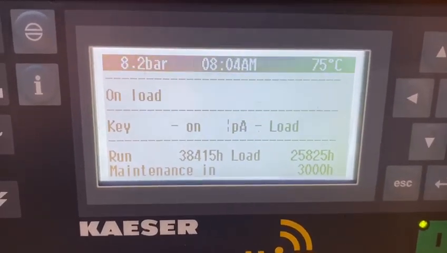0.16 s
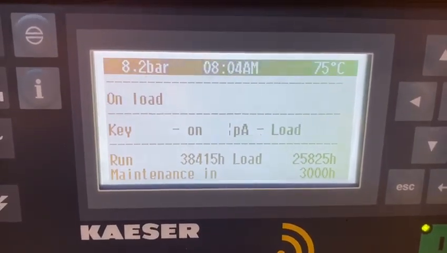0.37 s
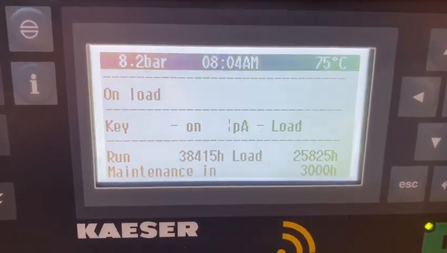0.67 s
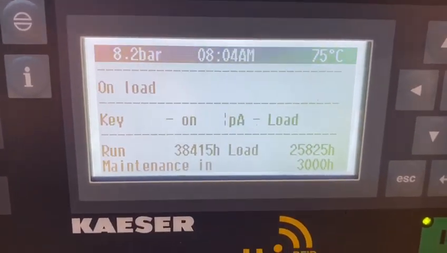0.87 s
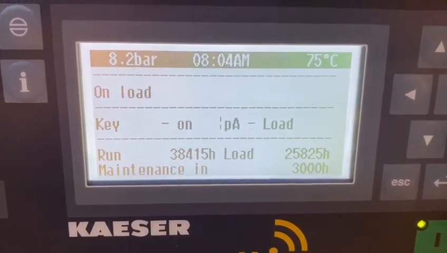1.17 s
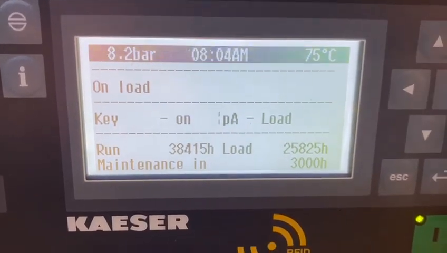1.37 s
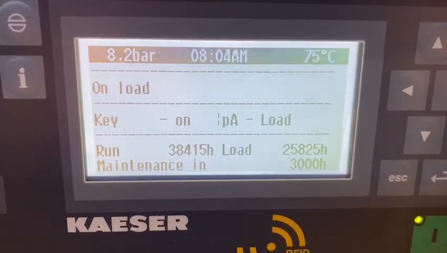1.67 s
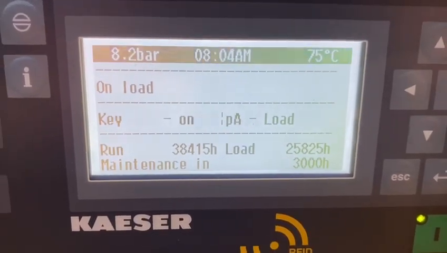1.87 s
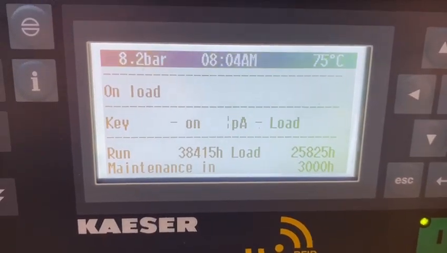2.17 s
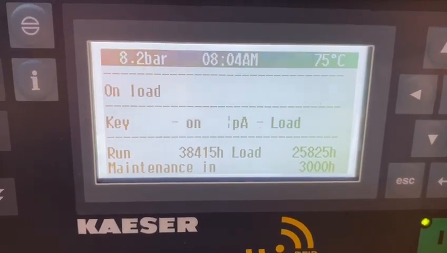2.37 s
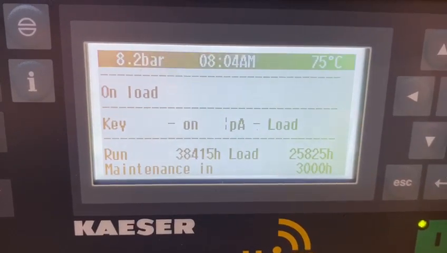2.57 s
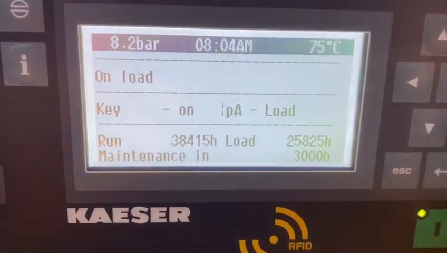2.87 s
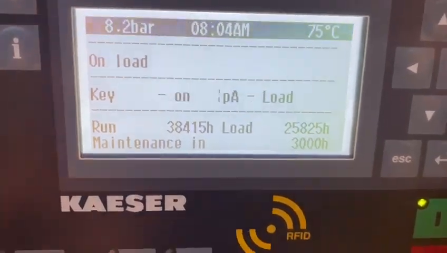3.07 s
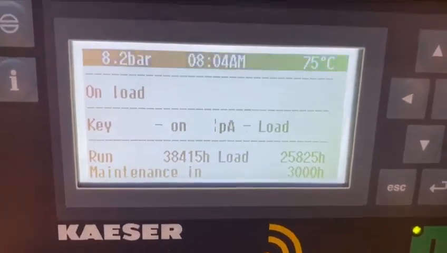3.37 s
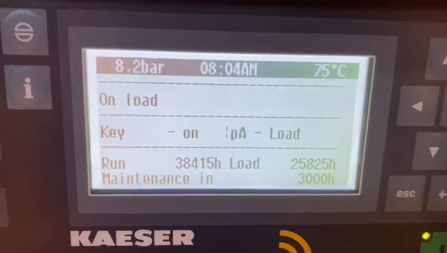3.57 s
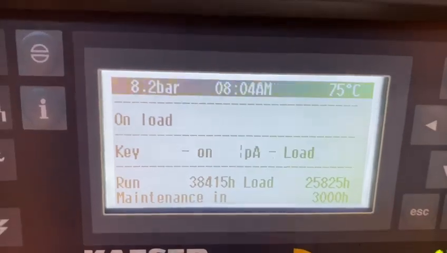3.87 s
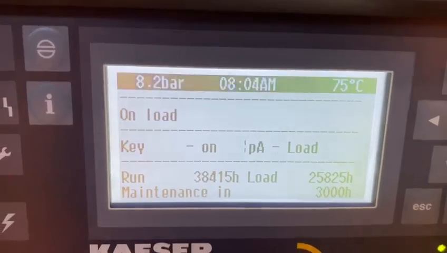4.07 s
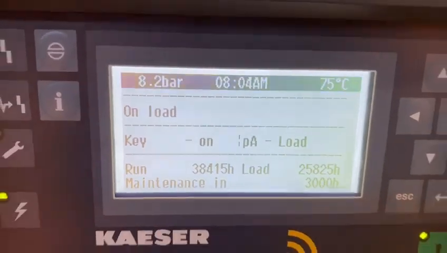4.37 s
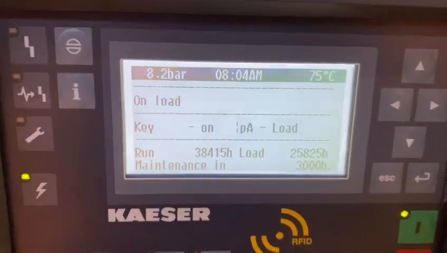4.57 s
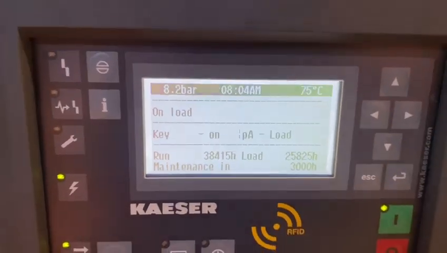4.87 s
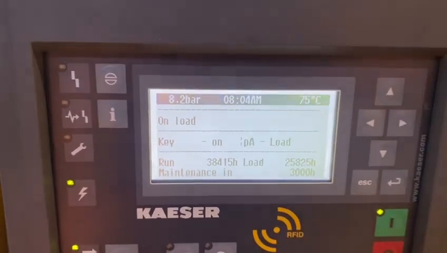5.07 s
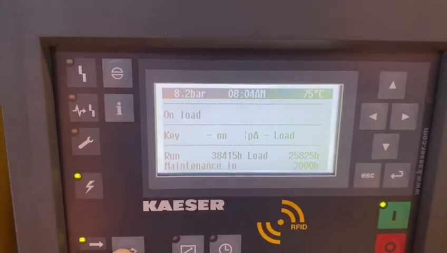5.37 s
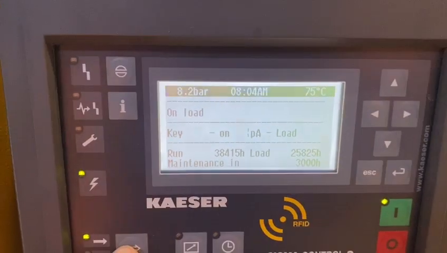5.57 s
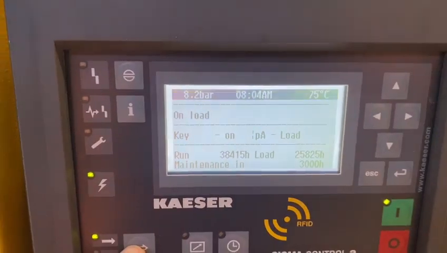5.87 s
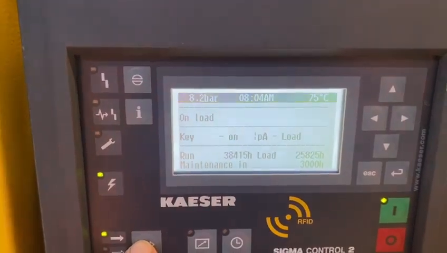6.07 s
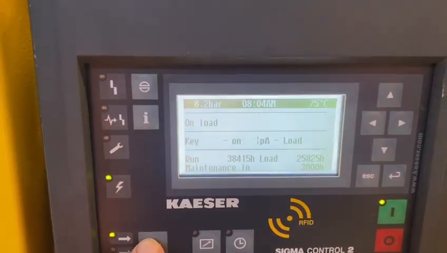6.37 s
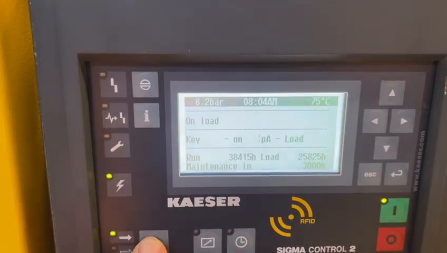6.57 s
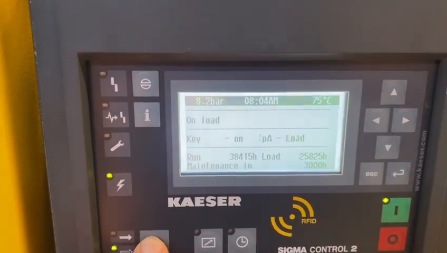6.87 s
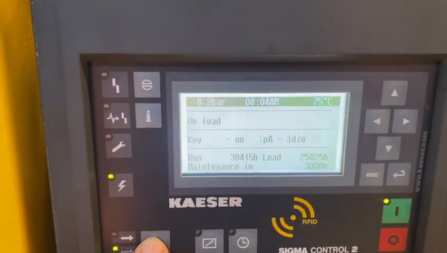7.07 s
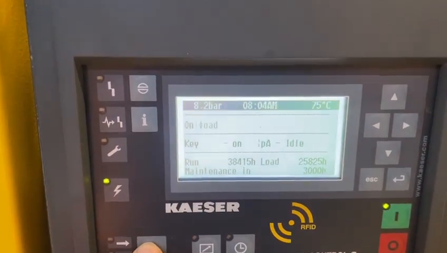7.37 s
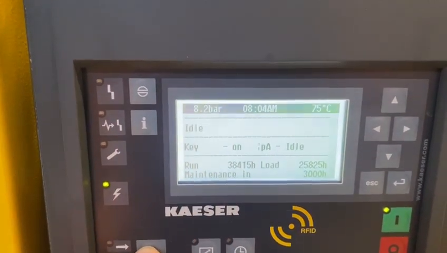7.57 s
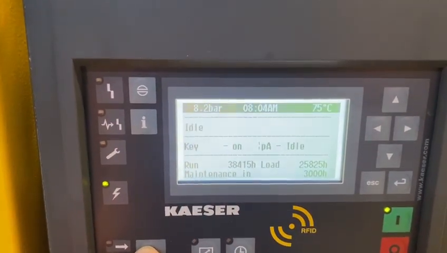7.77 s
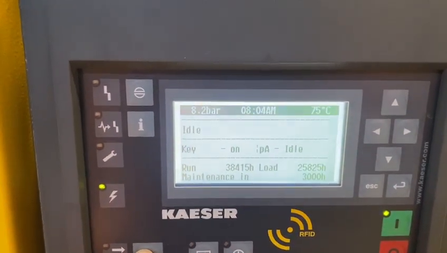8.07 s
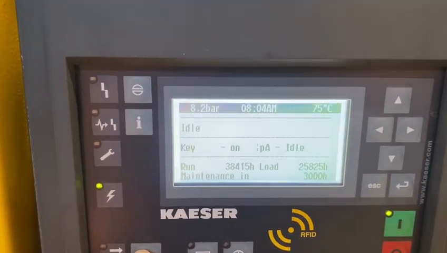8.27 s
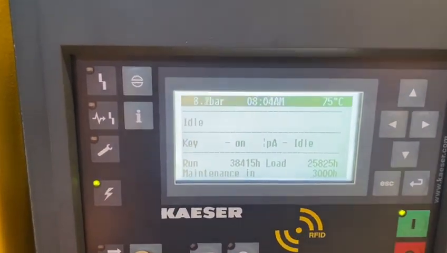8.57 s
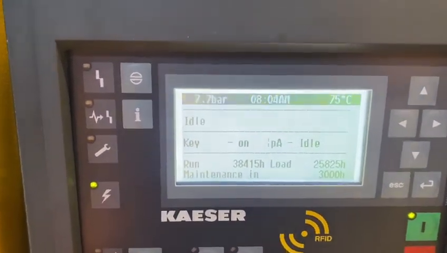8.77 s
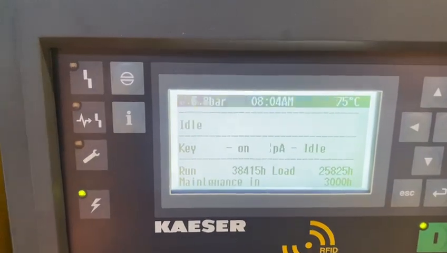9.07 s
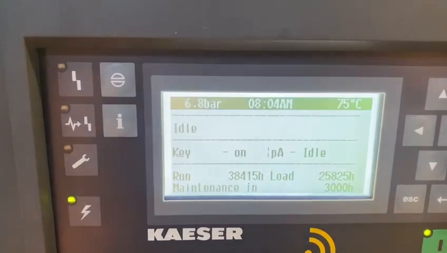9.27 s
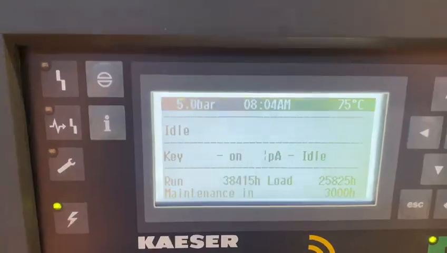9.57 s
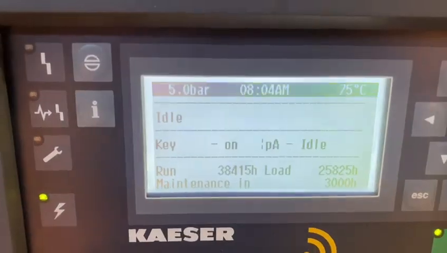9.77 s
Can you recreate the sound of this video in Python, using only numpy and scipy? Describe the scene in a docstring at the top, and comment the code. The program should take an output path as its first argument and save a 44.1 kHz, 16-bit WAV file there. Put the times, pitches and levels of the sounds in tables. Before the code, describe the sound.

A strong, high, ringing hiss of air sits above the even hum, roar and cooling fan rumble of a screw compressor working under load. It is heard close up in a workshop, its colour shifting gently as the microphone moves aside and back. In the last second or two the compressor goes idle: the hum changes tone and the hiss softens, while the motor and fan keep running.

```python
"""A bright hiss, ringing near 6 kHz, over a hum and a low rumble: a rotary screw air compressor on load.
We are in a workshop, the hand-held microphone close to the control panel, then to one side, then a step
back. Air rushing through the valves hisses and rings in the pipes; the screws roar and hum; the fan
rumbles. Near the end the machine unloads: the pressure falls, the hiss eases, the roar grows a little."""
import sys
import numpy as np
from scipy import signal
from scipy.fft import irfft
from scipy.io import wavfile
from scipy.ndimage import uniform_filter1d

SR = 44100
rng = np.random.default_rng(int(sys.argv[2]) if len(sys.argv) > 2 else 0)


def put_to_file(sound):
    """Save the sound as 16-bit audio at rate SR, in the file named by the first command-line argument."""
    columns = np.atleast_2d(sound).T  # one column per channel
    safe = np.clip(columns, -1, 1)
    whole_steps = np.round(safe * 32767)
    wavfile.write(sys.argv[1], SR, whole_steps.astype(np.int16))


N = 437463
TIME, HZ = np.arange(N) / SR, np.maximum(np.arange(N // 2 + 1) * SR / N, 1)

# The microphone's path. Each row: time in seconds, spot (0 at the panel, 1 to one side, 2 a step back).
MIC_PATH = [(0, 0), (2.85, 0), (3.25, 1), (4.3, 1), (5.0, 2), (9.92, 2)]
# Resonances of the pipes, the rotor housing and the cabinet.
# Each row: frequency in Hz, half width in Hz, relative level in dB at spots 0, 1 and 2.
PIPE_MODES = [(3022, 59, -71.5, -71.5, -66.5), (3131, 35, -65.0, -69.0, -66.0),
              (3316, 47, -72.0, -69.0, -63.5), (3613, 44, -66.5, -65.5, -73.5),
              (3827, 45, -63.5, -72.5, -79.5), (4088, 51, -70.5, -77.5, -69.5),
              (4305, 110, -74.5, -71.5, -65.5), (4603, 55, -64.5, -59.5, -65.0),
              (4867, 28, -67.5, -75.0, -65.0), (4992, 41, -68.5, -70.0, -72.0),
              (5105, 41, -67.5, -63.0, -62.0), (5215, 39, -61.5, -69.5, -63.5),
              (5294, 64, -66.0, -62.5, -64.5), (5450, 47, -66.5, -74.5, -66.5),
              (5641, 29, -60.0, -74.0, -63.0), (5732, 25, -56.5, -58.5, -63.5),
              (5793, 32, -55.5, -60.0, -59.5), (5889, 50, -59.0, -60.5, -65.0),
              (5994, 36, -57.5, -51.0, -57.0), (6114, 44, -52.5, -61.5, -55.5),
              (6233, 29, -58.0, -59.0, -57.5), (6310, 40, -62.5, -52.5, -58.0),
              (6406, 30, -54.0, -50.5, -51.0), (6420, 400, -67.0, -62.0, -62.0),
              (6477, 37, -58.0, -57.0, -62.5), (6578, 30, -57.5, -54.5, -51.5),
              (6738, 44, -58.0, -59.5, -65.0), (6867, 38, -66.5, -68.0, -66.0),
              (7059, 64, -71.5, -68.5, -66.0), (7370, 90, -78, -72, -68.5), (7620, 55, -69.5, -68.0, -68.5)]
HOUSING_MODES = [(1045, 30, -67, -73.5, -74), (1093, 16, -72, -71, -75), (1530, 17, -68, -68.5, -70),
                 (1786, 11, -70, -64.5, -68), (2043, 18, -67.5, -64, -75)]
CABINET_MODES = [(117, 15, -58, -60, -61), (147, 10, -63, -64, -62), (318, 18, -68, -69, -69),
                 (420, 34, -67, -66, -69.5), (632, 16, -76, -77, -79), (692, 18, -76, -76, -77)]
# Broad noise of the valves, the screws and the fan. Each row: frequency in Hz, relative level in dB.
HISS_SPECTRUM = [(1900, -85), (2400, -81), (2750, -71), (3100, -67.5), (3650, -67.5), (4300, -65.5),
                 (5200, -66.5), (6200, -65.5), (7200, -69), (7900, -69), (8300, -74.5), (8550, -102)]
ROAR_SPECTRUM = [(850, -82), (950, -79), (1150, -76), (1380, -73.5), (1550, -68), (1750, -65),
                 (2000, -69.5), (2250, -72), (2700, -73), (3300, -81), (4200, -85)]
RUMBLE_SPECTRUM = [(20, -85), (35, -85), (52, -75.5), (85, -69), (130, -65), (200, -64), (280, -70.5),
                   (480, -74.5), (580, -78), (850, -81), (1000, -90.5)]
# The screw lobes pass faster as the motor is relieved. Each row: time in seconds, passing rate in Hz.
LOBE_RATE = [(0, 248.05), (8.35, 248.05), (8.6, 248.8), (9.1, 249.2), (9.92, 249.5)]
# Lobe harmonics, from the first up.
# Each row: level in dB at spots 0, 1 and 2, change in dB once the intake is shut.
LOBE_TONES = [(-51, -50.5, -53.5, -1), (-61, -62, -63, 5.5), (-60.5, -61.5, -65.5, 1),
              (-56, -58.5, -57, -15), (-64, -67, -64.5, -4)]
# Brief swells of single lobe tones. Each row: peak time and half length in seconds, harmonic, rise in dB.
LOBE_SWELLS = [(4.05, .25, 2, 10.5), (8.5, .15, 3, 5), (9.15, .22, 3, 12), (9.2, .2, 2, 4)]
# How alike the microphone's two ports sound. Each row: frequency in Hz, likeness from 0 to 1.
PORT_LIKENESS = [(30, .7), (55, .93), (110, .97), (300, .88), (540, .55), (750, .75), (1100, .55),
                 (1400, .68), (1800, .7), (2250, .72), (2700, .55), (3300, .58), (4200, .45), (5500, .5),
                 (6500, .65), (8000, .55)]
# Balance between the ports. Each row: frequency in Hz, left minus right in dB.
PORT_BALANCE = [(50, -5.4), (110, -1.5), (220, -1.9), (420, -5.5), (750, -.7), (1000, -.8), (1150, -2.8),
                (1900, -1.2), (2800, -.9), (4200, 1.4), (5000, 3), (5450, 7), (5900, 4.3), (6600, 3.2),
                (7200, -.3), (8000, -.4)]
# Phase between the ports, on top of their lag. Each row: frequency in Hz, lead of the left in radians.
PORT_PHASE = [(40, 2.5), (60, 2.15), (80, 1.7), (110, 1.15), (350, -.1), (550, .8), (750, .15),
              (1000, -.35), (1100, -.9), (1400, -.6), (2300, .2), (3200, .6), (4100, -.4), (5200, .5),
              (5600, .4), (5780, -.9), (5980, .7), (6600, .6), (8000, .3)]

# Each source: gain in dB at spots 0, 1 and 2, change in dB once unloaded.
RING_DB, HISS_DB = (-0.5, 0, 0.5, -8), (0.075, -.1, -0.68, -1.5)
ROAR_DB, RUMBLE_DB = (0.2, 0, 0.8, 2.5), (-0.38, -0.5, -0.019, 0.4)
INTAKE_SHUTS_AT_S, SHUTTING_S = 8.3, .25
UNLOAD_AT_S, VENT_S = 8.43, 1.36   # the pressure bleeds away steadily
PORT_LAG_S, CUTOFF_HZ = .00043, 8600


def from_db(db):
    """Decibels to gain."""
    return 10 ** (np.asarray(db) / 20)


def rms_one(x):
    """Scale to an rms of 1."""
    return x / np.sqrt(np.mean(x ** 2) + 1e-20)


def ramp(start_s, length_s):
    """Rises steadily from 0 to 1."""
    return np.clip((TIME - start_s) / length_s, 0, 1)


def over_time(points):
    """A table joined by straight lines in time."""
    return np.interp(TIME, *np.transpose(points))


def over_hz(points):
    """A table joined by straight lines on a log-frequency axis."""
    hz, value = np.transpose(points)
    return np.interp(np.log(HZ), np.log(hz), value)


def colour(points):
    """Power per Hz of a broad noise, falling steeply beyond the table's ends."""
    outside = np.minimum(HZ / points[0][0], 1) * np.minimum(points[-1][0] / HZ, 1)
    return from_db(over_hz(points)) ** 2 * outside ** 8


def resonances(modes):
    """Power per Hz of steep-sided resonances, as heard from each spot."""
    hz, width, *spot_db = np.transpose(modes)
    shapes = 1 / (1 + ((HZ - hz[:, None]) / width[:, None]) ** 2) ** 2
    return (from_db(spot_db) ** 2 @ shapes)[:, None]


def spectral_ripple(depth_db, spacing_hz):
    """Steady random peaks and dips give noise a slightly metallic ring, different at each spot and port."""
    ripples = np.tanh(rng.standard_normal((6, N // 100)))
    power = from_db([depth_db * np.interp(HZ / spacing_hz, np.arange(len(r)), r) for r in ripples]) ** 2
    return power.reshape(3, 2, -1) / power.mean()


def drift(rate_hz):
    """Slow random wander with a spread of 1."""
    pole = np.exp(-200 * np.pi * rate_hz / SR)   # one step every 100 samples
    slow = signal.lfilter([1], [1, -2 * pole, pole ** 2], rng.standard_normal(N // 100 + 2002))[2000:]
    return np.interp(np.arange(N) / 100, np.arange(len(slow)), rms_one(slow))


def eddies(x, depth_db, life_s):
    """Eddies in the flow: every narrow band swells and sinks on its own; the overall level is kept."""
    _, frame_s, cells = signal.stft(x, SR, nperseg=2048)
    pole = np.exp(-frame_s[1] / life_s)
    swell = uniform_filter1d(rng.standard_normal(cells.shape[1:]), size=3, axis=0)
    swell = signal.lfilter([1], [1, -2 * pole, pole ** 2], swell)
    _, fluttering = signal.istft(cells * from_db(depth_db * rms_one(swell)))
    return x.std() * rms_one(fluttering[:, :N])


def level(row, progress):
    """A source's dB from where the microphone is, shifted as the machine unloads (progress 0 to 1)."""
    *spot_db, unloaded_db = row
    return np.interp(over_time(MIC_PATH), [0, 1, 2], spot_db) + unloaded_db * progress


def microphone_ports():
    """Gain and phase at the left and right port: the machine's sound reaches the left one first."""
    lead = 2 * np.pi * HZ * PORT_LAG_S + over_hz(PORT_PHASE)
    half = np.array([[.5], [-.5]])
    return from_db(half * over_hz(PORT_BALANCE)) * np.exp(1j * half * lead)


def turbulence(spot_powers, ports, likeness):
    """Flow noise, its colour gliding from spot to spot; workshop reflections make the two ports differ."""
    mid, side = rng.standard_normal((2, len(HZ))) + 1j * rng.standard_normal((2, len(HZ)))
    spectrum = ports * (np.sqrt(1 + likeness) * mid + np.sqrt(1 - likeness) * side * [[1], [-1]])
    at_spots = [irfft(spectrum / 2 * np.sqrt(power * SR * N / 2), N) for power in spot_powers]
    spot = over_time(MIC_PATH)
    return sum(np.maximum(1 - abs(spot - k), 0) * noise for k, noise in enumerate(at_spots))


def hum(rate_hz, levels_db, ports, wander, waver_db):
    """Harmonics of a passing rate; the shaft speed wanders slightly and each tone wavers."""
    cycles = np.cumsum(rate_hz * (1 + wander * drift(1.77))) / SR
    tones = 0
    for k, db in enumerate(levels_db, 1):
        response = ports[:, [int(k * np.mean(rate_hz) * N / SR)]]
        wave = abs(response) * np.sin(2 * np.pi * (k * cycles + rng.random()) + np.angle(response))
        tones = tones + np.sqrt(2) * from_db(db + waver_db * drift(1.8)) * wave
    return tones


def pipe_ring(ports, vented, flutter_db=0.43):
    """The air jet drives narrow pipe resonances and flutters in strength."""
    power = resonances(PIPE_MODES) * spectral_ripple(depth_db=3.5, spacing_hz=10)
    ring = turbulence(power, ports, likeness=0.72)
    gain = from_db(level(RING_DB, vented) + flutter_db * drift(13))
    return gain * eddies(ring, depth_db=0.6, life_s=.04)


def valve_hiss(ports, vented, flutter_db=1.33):
    """Air under pressure rushes through the valves with a broad, fluttering hiss."""
    power = colour(HISS_SPECTRUM) * spectral_ripple(depth_db=8.5, spacing_hz=24)
    hiss = turbulence(power, ports, over_hz(PORT_LIKENESS))
    gain = from_db(level(HISS_DB, vented) + flutter_db * drift(17))
    return gain * eddies(hiss, depth_db=2.2, life_s=.03)


def screw_roar(ports, vented):
    """The rotors' rough mid-range roar comes through the cabinet, housing resonances standing out."""
    broad = colour(ROAR_SPECTRUM) * spectral_ripple(depth_db=6.0, spacing_hz=13)
    roar = turbulence(broad + resonances(HOUSING_MODES), ports, over_hz(PORT_LIKENESS))
    return from_db(level(ROAR_DB, vented)) * eddies(roar, depth_db=1.7, life_s=.035)


def lobe_hum(ports):
    """The passing screw lobes hum; single tones swell briefly, and the top two drop as the intake shuts."""
    shut = ramp(INTAKE_SHUTS_AT_S, SHUTTING_S)
    levels_db = [level(row, shut) for row in LOBE_TONES]
    for peak_s, half_s, harmonic, rise_db in LOBE_SWELLS:
        levels_db[int(harmonic) - 1] += rise_db * np.exp(-((TIME - peak_s) / half_s) ** 2)
    return hum(over_time(LOBE_RATE), levels_db, ports, wander=.0005, waver_db=1.1)


def fan_rumble(ports, vented, churn_db=1.2):
    """Cooling air churns and booms in the cabinet."""
    power = colour(RUMBLE_SPECTRUM) + resonances(CABINET_MODES)
    rumble = turbulence(power, ports, over_hz(PORT_LIKENESS))
    gain = from_db(level(RUMBLE_DB, vented) + churn_db * drift(9.1))
    return gain * eddies(rumble, depth_db=1.0, life_s=.03)


def blade_hum(ports):
    """The passing fan blades give a low tone and its octave."""
    return hum(rate_hz=113.0, levels_db=[-51, -55], ports=ports, wander=0.002, waver_db=1.5)


def scene():
    """Air, screws and fan, all running from the start, as they reach the moving microphone."""
    ports, vented = microphone_ports(), ramp(UNLOAD_AT_S, VENT_S)
    air = pipe_ring(ports, vented) + valve_hiss(ports, vented)
    screws = lobe_hum(ports) + screw_roar(ports, vented)
    fan = fan_rumble(ports, vented) + blade_hum(ports)
    return air + screws + fan


def record(dry):
    """The top treble is cut steeply."""
    return signal.sosfilt(signal.ellip(10, .1, 90, CUTOFF_HZ, fs=SR, output="sos"), dry)


dry = scene()
out = record(dry)
put_to_file(out)
```